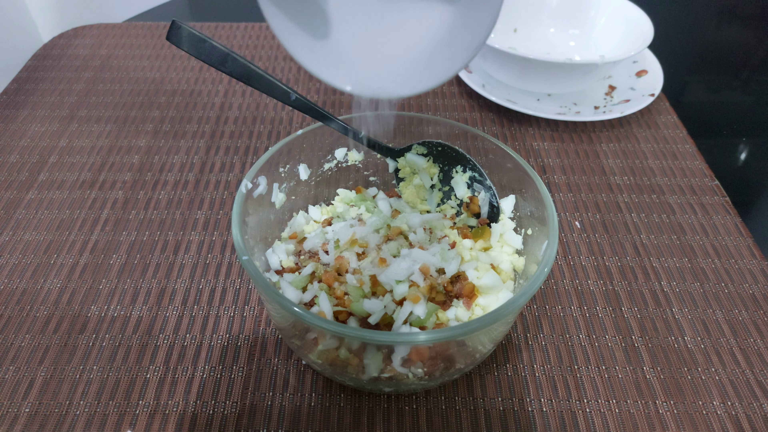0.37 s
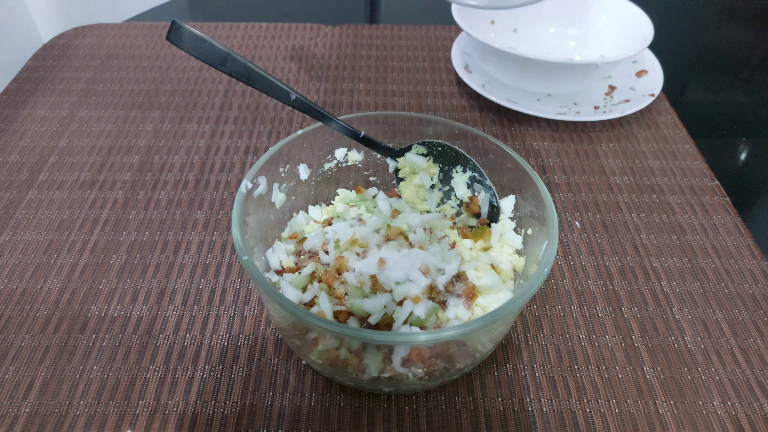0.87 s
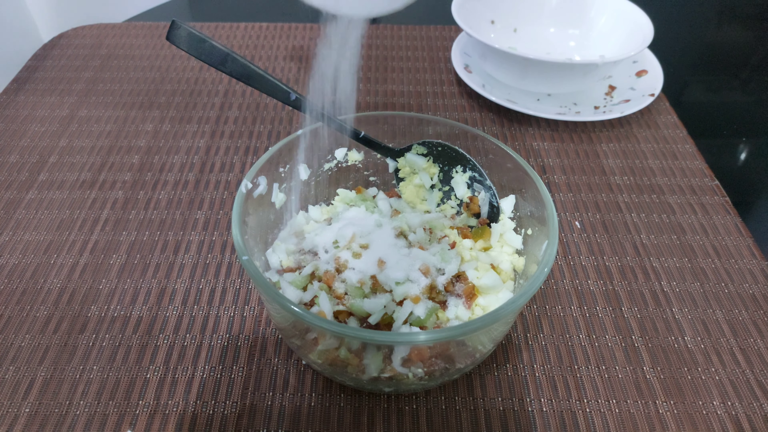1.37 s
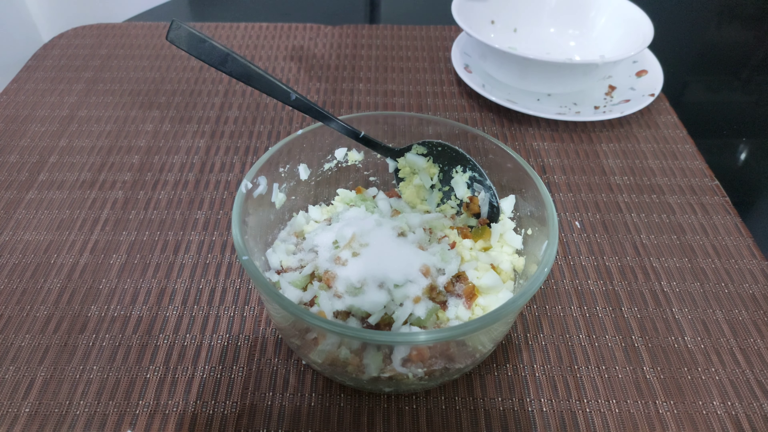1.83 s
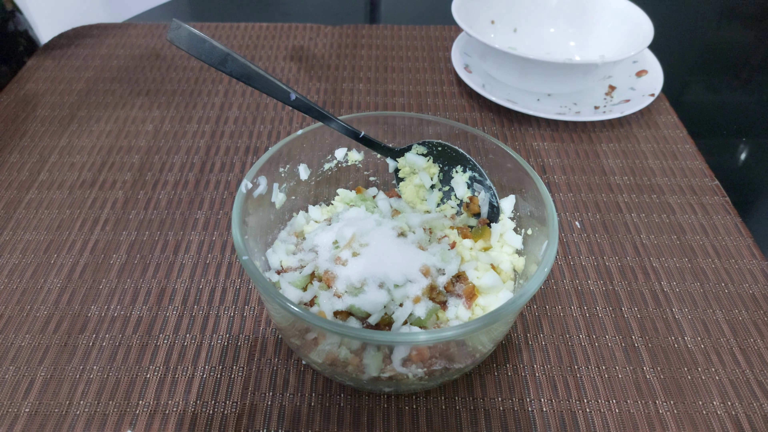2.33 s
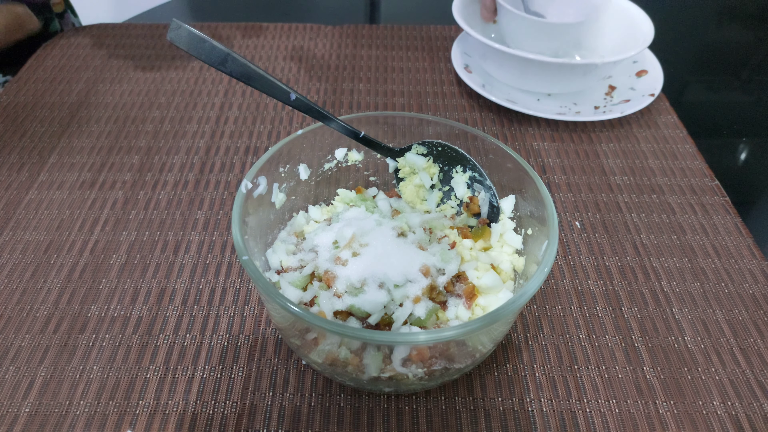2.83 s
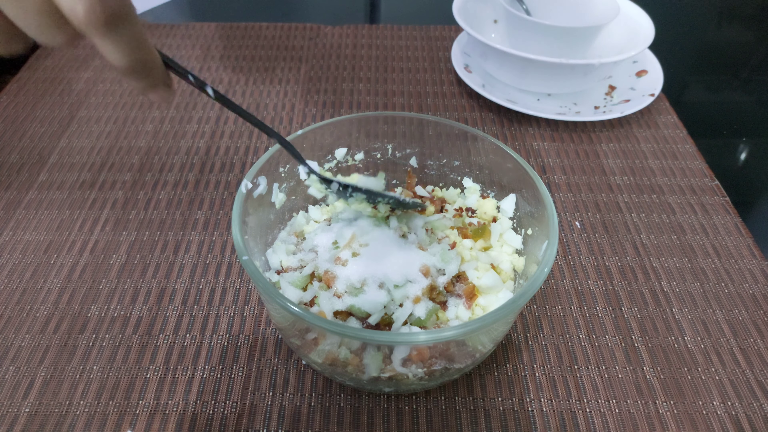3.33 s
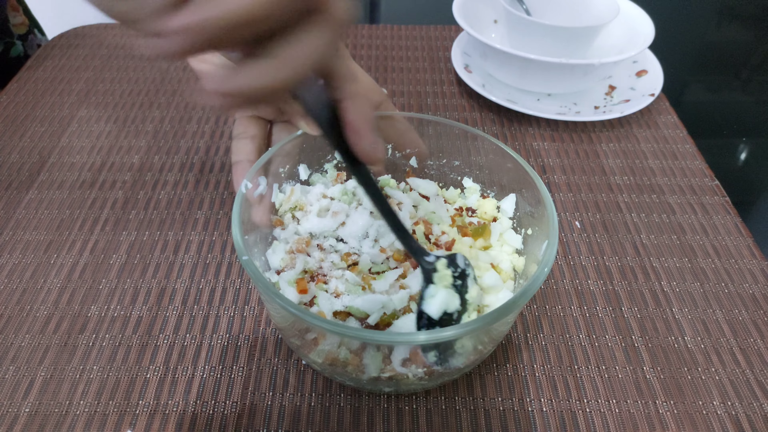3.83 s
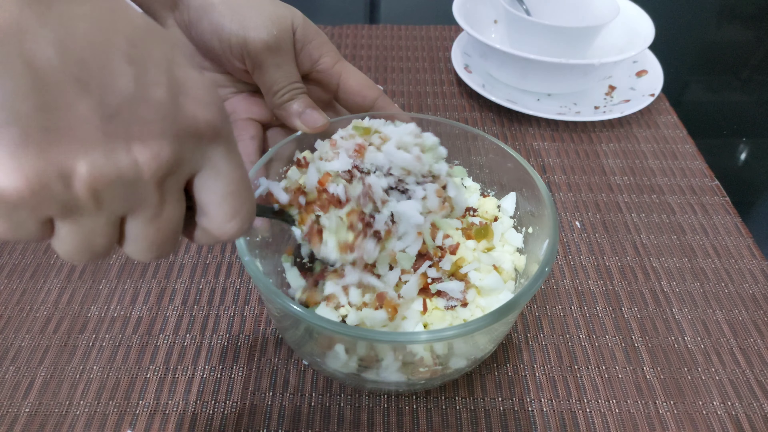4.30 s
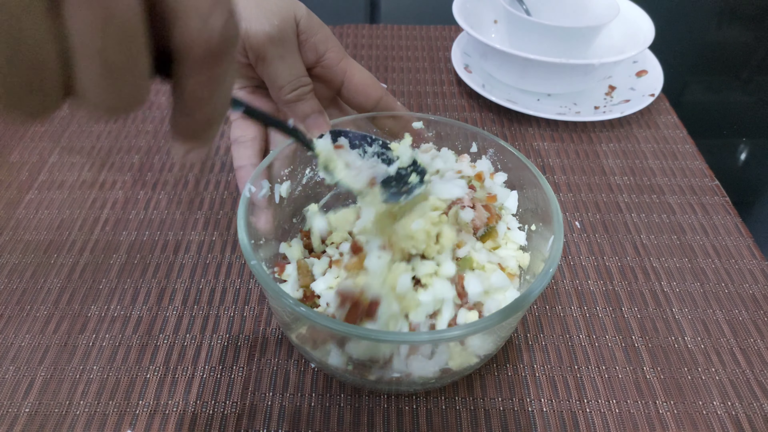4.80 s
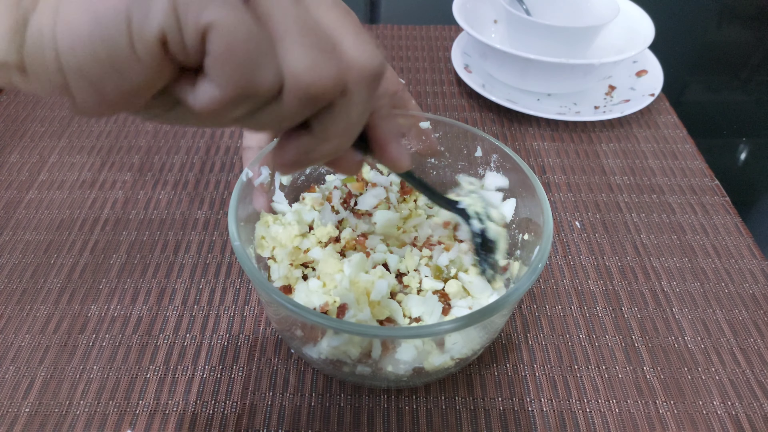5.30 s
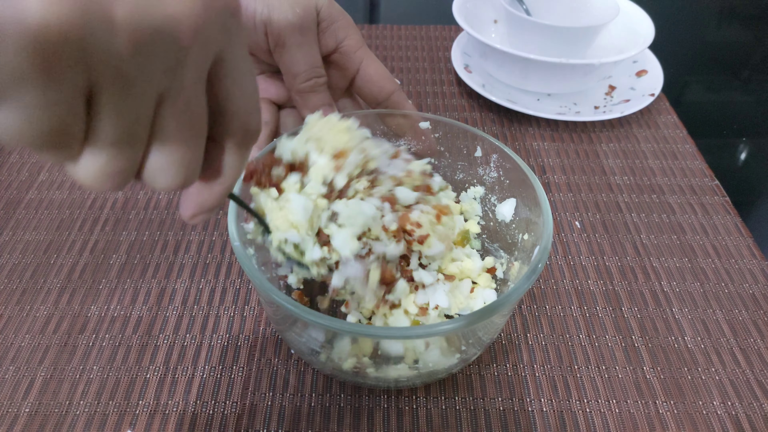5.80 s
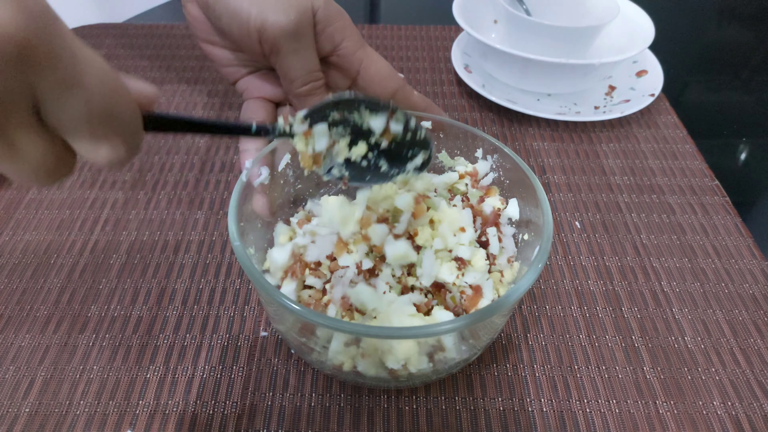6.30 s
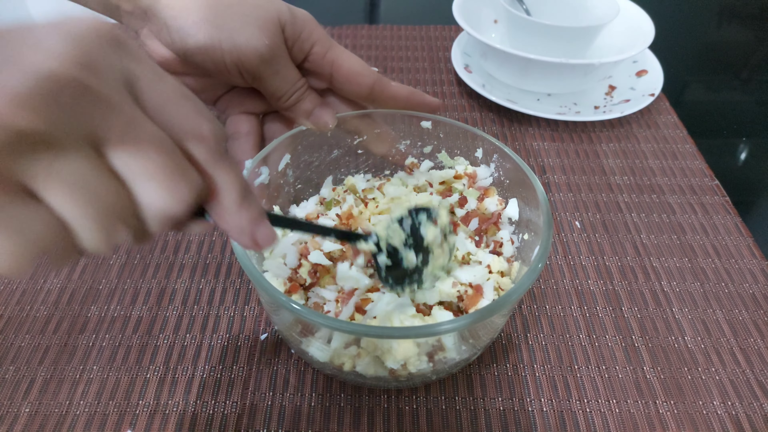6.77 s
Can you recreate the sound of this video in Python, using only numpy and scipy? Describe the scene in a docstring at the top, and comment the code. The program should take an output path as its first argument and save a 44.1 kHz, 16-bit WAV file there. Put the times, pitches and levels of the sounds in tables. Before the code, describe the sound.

Close, single-channel pickup in a hard-walled kitchen. Nearly two seconds of steady rumble and hiss with tiny squeaks, then brushing hands and thin spoon clinks. A stack of ceramic bowls is set down twice, sharp and then heavier with metallic chatter and a faint ringing bowl. After a pause, a spoon scrapes and knocks inside a full glass bowl, with short damped clinks, a rising grating slide and a strong last tap.

```python
"""Spoon and bowls in a small kitchen

A metal spoon clinks and rattles on stacked ceramic bowls, the stack is set down twice on the table,
then the spoon knocks and scrapes inside a glass bowl of food. Clicks set banks of resonances ringing.
Under it filtered noise makes a low room rumble, hiss, faint squeaks and a few soft rustles,
and a pulsed sine makes a far cricket. A short noise tail is the echo of the hard walls."""
import sys
import numpy as np
from scipy import signal
from scipy.fft import rfft, irfft
from scipy.io import wavfile

SR = 44100
rng = np.random.default_rng(int(sys.argv[2]) if len(sys.argv) > 2 else 0)


def generate_wav(sig):
    """Save sig (samples, or channels by samples) to the path in sys.argv[1] as 16-bit PCM at SR."""
    pcm = np.round(np.clip(np.atleast_2d(sig).T, -1, 1) * 32767).astype(np.int16)
    wavfile.write(sys.argv[1], SR, pcm)


def elevation(decibels):
    """Turn decibel levels (scalar or array-like) into linear amplitude ratios."""
    levels = np.asarray(decibels, float)
    return 10 ** (levels / 20)


N = 304290   # samples, 6.9 s

# a plain contact on glass: one level/dB for each zone of modes, low to high
GLASS_PLAIN = [0.15, 0, -1.5, 1.3]
# a broad contact knocks, an edge is bright: rows knock, brightness; columns zones, low to high [dB per dB]
GLASS_FOLLOWS = [
    [0.97, 0.0023, 0, 0],
    [0, 0, 0.65, 1],
]


def rms_one(x):
    """Scale to unit power."""
    return x / np.sqrt(np.mean(x ** 2) + 1e-20)


def at_hz(points, hz):
    """Read a table of (f/Hz, value) on a log-frequency axis."""
    table_hz, values = np.transpose(points)
    return np.interp(np.log(hz), np.log(table_hz), values)


def ring(force, hz, t60):
    """A resonance: a unit click sets a sine of height 1 ringing, 60 dB down after t60 seconds."""
    r, w = elevation(-60 / (t60 * SR)), 2 * np.pi * hz / SR
    return signal.lfilter([0, np.sin(w)], [1, -2 * r * np.cos(w), r * r], force + 1e-18)


def band(x, low_hz, high_hz):
    """Keep only the pitches between two limits (Butterworth band-pass)."""
    edges = [low_hz, min(high_hz, .45 * SR)]
    return signal.sosfilt(signal.butter(2, edges, "band", fs=SR, output="sos"), x)


def coloured(spectrum, x):
    """Give a white signal the spectrum; rms 1."""
    hz = np.maximum(np.fft.rfftfreq(N, 1 / SR), 1)
    return rms_one(irfft(rfft(x) * elevation(at_hz(spectrum, hz)), N))


def grains(per_s, spread_db):
    """Uneven random clicks of unit power, like many tiny contacts."""
    sizes = elevation(spread_db * np.minimum(rng.exponential(1, N), 5)) * rng.choice([-1, 1], N)
    return rms_one(sizes * (rng.random(N) < per_s / SR))


def drift(rate):
    """Random wander of spread 1, with a new target `rate` times a second."""
    knots = rng.standard_normal(int(7 * rate) + 2)
    return np.interp(np.arange(N) / SR * rate, np.arange(len(knots)), knots)


def swell(start, rise, fall, depth_db):
    """Gain that climbs to 1 and sinks again, straight in dB; silent outside."""
    corners = np.cumsum([start, rise, fall])
    db = np.interp(np.arange(N) / SR, corners, [-depth_db, 0, -depth_db], left=-200, right=-200)
    return elevation(db)


def while_touching(spans):
    """Gains of each column over time, silent between the spans."""
    t, out = np.arange(N) / SR, 0
    for rows in spans:
        s, *columns = np.transpose(rows)
        out = out + np.array([elevation(np.interp(t, s, c, left=-200, right=-200)) for c in columns])
    return out


def room_rumble():
    """Low background rumble: steady noise gathered at low pitches."""
    # shape of the rumble: f/Hz, relative level per Hz/dB
    spectrum = [(15, -38), (25, -14.5), (53, -2.5), (91, -11), (117, -4), (167, 0.5), (204, -5), (237, -3),
                (260, -7.5), (293, -6.5), (413, -12.5), (448, -16), (600, -19.5), (780, -47), (1320, -120)]
    return elevation(-57) * coloured(spectrum, rng.standard_normal(N))


def room_hiss():
    """Faint steady hiss: noise spread from the middle pitches upward."""
    # shape of the hiss: f/Hz, relative level per Hz/dB
    spectrum = [(290, -28.5), (500, -5.5), (706, -5), (1990, -15), (2600, -18.5), (2900, -15),
                (3300, -19.5), (4310, -21), (8600, -22.5), (11200, -28.5), (12000, -33), (15500, -37.5)]
    return elevation(-69.5) * coloured(spectrum, rng.standard_normal(N))


def cricket():
    """Far cricket: short sine chirps at a near-steady rate, randomly stronger and weaker."""
    pitch_hz, per_s, level_db = 6680, 12.6, -81
    count = int(N / SR * per_s) - 1
    times = 0.078 + np.arange(count) / per_s + rng.normal(0, .003, count)
    gate = np.zeros(N)
    gate[(times * SR).astype(int)] = elevation(level_db + rng.normal(0, 3, count))
    gate = signal.fftconvolve(gate, np.hanning(900), "same")   # each chirp is 900 samples long
    return gate * np.sin(2 * np.pi * pitch_hz * np.arange(N) / SR)


def squeaks():
    """Faint high whistles: noise through one narrow resonance, swelling and fading."""
    # the whistles: t/s, length/s, level/dB
    whistles = [(.62, .05, -87), (1.12, .08, -80), (1.547, .06, -82)]
    t = np.arange(N) / SR
    gain = sum(elevation(db) * np.exp(-((t - s) / (.5 * length)) ** 2) for s, length, db in whistles)
    return gain * rms_one(ring(rng.standard_normal(N), hz=8600, t60=0.018))


def rustles():
    """Hands and food brushing: dense fine grains over a dull body."""
    # each rustle: t/s at the start, rise/s, fall/s, hiss level/dB, dull level/dB before a small cut
    brushes = [(1.86, .02, 0.25, -66.5, -68.5), (1.99, 0.042, .075, -68, -58.5),
               (2.16, .007, .013, -66, -75), (2.255, .016, .06, -59, -60), (3.79, 0.0306, .035, -69, -74),
               (4.96, .03, 0.038, -71, -82), (5.338, .014, .012, -50.5, -54),
               (5.35, .012, 0.09, -63.5, -72), (6.72, .04, 0.108, -58.5, -62)]
    # shape of the hiss: f/Hz, relative level per Hz/dB
    spectrum = [(1180, -41), (2000, -14), (3210, 0.5), (3900, -4), (8520, -12.5), (14000, -31)]
    hiss, dull = 0, 0
    for s, rise, fall, hiss_db, dull_db in brushes:
        gain = swell(s, rise, fall, depth_db=21)
        hiss = hiss + elevation(hiss_db) * gain
        dull = dull + elevation(dull_db) * gain
    fine = grains(5000, spread_db=3.5)
    return hiss * coloured(spectrum, fine) + elevation(-2.5) * dull * rms_one(band(fine, 450, 2300))


def free_bowl():
    """One bowl rings on: a single faint resonance struck once, heard direct."""
    # the strike: t/s, f/Hz, level/dB, ring time to -60 dB/s
    strike = (3.09, 617, -46, .8)
    s, hz, db, t60 = strike
    return ring(elevation(db) * (np.arange(N) == round(s * SR)), hz, t60)


def table():
    """Soft low pushes make the resonances of the table top answer."""
    # the pushes: t/s, level/dB before a small cut
    thuds = [(2.855, -38), (2.906, -24), (3.05, -27), (3.965, -40), (5.956, -40.5)]
    # resonances of the table top: f/Hz, level before the band-pass/dB, ring time to -60 dB/s
    modes = [(85, -3, .07), (116, 5.5, 0.032), (174.4, 0.5, 0.09), (272, -2, 0.034)]
    force = np.zeros(N)
    for s, db in thuds:
        force[round(s * SR)] = elevation(db - 3.5)
    return band(sum(elevation(db) * ring(force, hz, t60) for hz, db, t60 in modes), 98, 500)


def kitchen(x):
    """Echo of the hard walls: noise dying band by band, starting after the first reflection."""
    # how long the echo lasts: f/Hz, time to -60 dB/s
    echo_time = [(100, 0.51), (500, 0.5), (2000, .33), (6000, 0.34), (14000, 0.13)]
    t = np.arange(SR // 2) / SR
    edges = 70 * 2 ** np.arange(0, 8.5, .5)   # Hz, half-octave bands
    white = rng.standard_normal((2, len(t)))
    tail = 0
    for k, (low, high) in enumerate(zip(edges, edges[1:])):
        dying = elevation(-60 * t / at_hz(echo_time, np.sqrt(low * high)))
        tail = tail + band(white[k % 2], low, high) * dying
    tail = tail * np.clip((t - .003) / 0.0073, 0, 1)
    return elevation(-10.5) * signal.fftconvolve(x, tail / np.sqrt(np.sum(tail ** 2)))[:N]


def glass_tones():
    """The glass sings briefly, knocked or rubbed by the spoon: short wavering sines swell and fade."""
    # each tone: t/s at the middle, f/Hz before the waver, length/s, level/dB
    songs = [(3.99, 1263, 0.031, -52), (3.985, 5330, 0.045, -59), (4.002, 1016, 0.071, -54),
             (3.981, 3150, .03, -55), (5.755, 960, .08, -59), (4.037, 4080, 0.023, -48),
             (4.196, 2330, 0.014, -44), (4.2, 4030, 0.028, -52), (4.392, 4095, 0.012, -45.5),
             (5.839, 4300, 0.009, -37.5), (5.926, 4630, 0.0099, -39.5), (6.072, 4020, 0.012, -54),
             (6.094, 2345, 0.025, -50), (6.099, 6200, 0.022, -61.5), (6.101, 990, 0.018, -52.5),
             (6.303, 4050, 0.013, -63.5)]
    t, out = np.arange(N) / SR, np.zeros(N)
    waver = np.cumsum(drift(rate=130)) / SR
    for s, hz, length, db in songs:
        gain = elevation(db) * np.exp(-((t - s) / (0.33 * length)) ** 2)
        out += gain * np.sin(2 * np.pi * hz * (t + 0.0056 * waver))
    return out


def slide():
    """The spoon drawn up the glass wall: its rough grating rises as the free length shortens."""
    # start and end of the slide: t/s, f/Hz, level/dB
    path = [(5.72, 3585, -46.5), (5.95, 4730, -66.5)]
    # the rough tones: multiple of the gliding pitch, relative level/dB
    partials = [(.74, -4), (1, 1.5), (1.201, -5.5)]
    s, hz, db = np.transpose(path)
    t, out = np.arange(N) / SR, np.zeros(N)
    turns = np.cumsum(np.interp(t, s, hz)) / SR
    for multiple, level_db in partials:
        rough = rms_one(band(grains(1500, spread_db=5.0), 10, 117))
        gain = elevation(level_db + 4.3 * drift(rate=35))   # each tone comes and goes
        out += gain * rough * np.sin(2 * np.pi * multiple * turns)
    return out * elevation(np.interp(t, s, db, left=-200, right=-200))


def by_zone(level_db, character_db, plain, follows):
    """dB in each zone of modes (last axis) from a contact's level and character."""
    return np.asarray(level_db)[..., None] + plain + np.asarray(character_db) @ np.array(follows)


def blows(rows, plain, follows):
    """Turn (t/s, level/dB, character/dB ..) into rows of (t/s, dB in each zone)."""
    rows = np.array(rows)
    return np.c_[rows[:, 0], by_zone(rows[:, 1], rows[:, 2:], plain, follows)]


def rattle(rows, plain, follows):
    """Gain of each zone over time for loose chatter that swells and dies away."""
    out = 0
    for s, rise, fall, db, character_db in rows:
        zone_gain = elevation(by_zone(db, [character_db], plain, follows))
        out = out + zone_gain[:, None] * swell(s, rise, fall, depth_db=22.5)
    return out


def body(modes, zones, hits, touch, per_s, hit_db, rub_db, crack_db, hiss_db,
         sharp, longest_s, patchy_db, top_hz):
    """Blows and dense small contacts drive the modes; a broad crack and hiss fill in between them."""
    modes, hits = np.array(modes), np.array(hits)
    zone = np.searchsorted(zones, modes[:, 0])
    at = (hits[:, 0] * SR).round().astype(int)
    chatter = grains(per_s, spread_db=2.5)
    uneven = rng.normal(0, 3.3, (len(hits), len(modes)))   # dB, no two blows alike
    out = np.zeros(N)
    for k, (hz, width, level_db) in enumerate(modes):
        z = zone[k]
        level_db = level_db - modes[zone == z, 2].max()   # the strongest mode of each zone is at 0 dB
        t60 = min(sharp * np.log(1000) / (np.pi * width), longest_s)   # a narrow mode rings longer
        # the loudness of the ringing follows the touch, however long the ring
        force = touch[z] * chatter * np.sqrt(4 * np.log(1000) / (t60 * SR))
        force *= elevation(rub_db + patchy_db * drift(rate=30))   # the contact point wanders across the nodes
        force[at] += elevation(hits[:, 1 + z] + hit_db + uneven[:, k])
        built_up = band(ring(force, hz, t60), hz - 320, hz + 320)   # the ring takes a moment to build
        out += elevation(level_db) * (-1) ** k * built_up
    edges = [0.53 * modes[:, 0].min(), *zones, top_hz]
    puff = rng.standard_normal(300) * np.exp(-np.arange(300) / (0.001 * SR))   # a crack of a few ms
    grit = grains(5000, spread_db=4.0)   # the finest roughness of the surfaces
    for z in range(4):
        clicks = np.zeros(N)
        clicks[at] = elevation(hits[:, 1 + z] + crack_db)
        broad = signal.fftconvolve(clicks, puff)[:N] + elevation(hiss_db) * touch[z] * grit
        share = np.sqrt(SR / 2 / (edges[z + 1] - edges[z]))   # makes up for the power outside the zone
        out += share * band(band(broad, edges[z], edges[z + 1]), .5 * edges[0], top_hz)
    return out


def scrape():
    """Gain of each zone over time while the spoon rubs the glass."""
    # two strokes along the glass: t/s, pressure level/dB, brightness/dB
    strokes = [
        [(3.965, -57.5, -0.5), (4.1, -64, -6.5), (4.22, -64.5, -2.5), (4.41, -67, -5), (4.46, -80, -6)],
        [(5.715, -54.5, -3.5), (5.83, -64.5, 6.5), (5.9, -61, -1), (5.955, -75, 3), (6.08, -65, -11),
         (6.13, -84, 0.5)],
    ]
    spans = []
    for stroke in strokes:
        rows = [(s, db, -1, bright_db) for s, db, bright_db in stroke]   # knock stays at -1 dB
        spans.append(blows(rows, GLASS_PLAIN, GLASS_FOLLOWS))
    return while_touching(spans)


def glass():
    """Glass bowl of food: the spoon's knocks and strokes excite its broad, short resonances."""
    # resonances of the glass: f/Hz, width/Hz before `sharp`, relative level/dB
    modes = [(960, 34, -5.5), (1077, 130, -3), (1346, 280, -2), (1970, 480, 2), (2330, 94, -4.5),
             (3060, 160, 0.5), (3448, 150, -4), (3760, 130, 2), (4080, 110, 6.5), (4410, 200, 3.5),
             (4920, 100, 1.5), (5415, 130, -2.5), (5960, 130, -0.5), (6270, 34, -8), (6674, 190, 2),
             (7166, 210, -2), (8680, 120, 1), (9200, 150, -5.5), (9800, 74, -16), (10730, 79, -13.5),
             (10900, 80, -25), (13100, 190, -25)]
    # limits between the four zones of modes: f/Hz
    zones = [1500, 3500, 5300]
    # knocks: t/s, relative level/dB, knock/dB, brightness/dB
    knocks = [(2.349, -60, 20, 8), (3.966, -47.5, 7, -5), (4.033, -43.5, -12, 14), (4.05, -41, -22, -11),
              (4.154, -50, -10, -3), (4.193, -40.5, -8, -6), (4.252, -62.5, 1, 15), (4.32, -47.5, 3, -4),
              (4.425, -38.5, -5, -13.5), (5.348, -43.5, -19, -3.5), (5.581, -55.5, 6, 10),
              (5.585, -39, -10, -7.5), (5.608, -52.5, -8, 3.5), (5.682, -49, -20, -11),
              (5.718, -40.5, -7, 2.5), (5.721, -32.5, 5, -3), (5.79, -38.5, -14, 4), (5.836, -44, -7, -2),
              (5.915, -47, 1.5, 0), (5.9565, -19, -12, -6.5), (6.529, -57.5, -14.5, 4.5)]
    return body(modes, zones, blows(knocks, GLASS_PLAIN, GLASS_FOLLOWS), scrape(),
                per_s=1300, hit_db=-5, rub_db=-6, crack_db=-8.5, hiss_db=-4.5,
                sharp=0.87, longest_s=0.046, patchy_db=6.5, top_hz=10950)


def china():
    """Stacked ceramic bowls: blows and rattling set many resonances ringing."""
    # resonances of the bowls: f/Hz, width/Hz before `sharp`, relative level/dB
    modes = [(344, 31, -5.5), (800, 30, -6), (990, 71, 0.5), (1440, 150, -1), (1735, 150, -9.5),
             (2222, 31, -1), (2377, 50, 1.5), (2630, 60, -5), (2986, 60, 2.5), (3370, 110, -1),
             (3700, 60, -4.5), (4150, 110, 0.5), (4510, 70, -1.5), (4623, 70, -2), (4900, 47, -5),
             (5407, 88, -0.5), (5790, 88, -3.5), (6200, 80, -7.5), (6530, 64, -6), (6700, 80, -6),
             (7240, 92, -7.5), (8100, 86, -12.5), (8800, 120, -9), (9400, 120, -25), (10800, 100, -24),
             (11150, 100, -22), (13100, 100, -28.5), (13400, 100, -27.5)]
    # limits between the four zones of modes: f/Hz
    zones = [1300, 3800, 7500]
    # blows: t/s, relative level/dB, brightness/dB
    strikes = [(2.265, -52.5, -9), (2.279, -60.5, -0.5), (2.855, -40.5, -10), (2.906, -11, 0.5),
               (2.909, -16, -2), (2.918, -18, -1.5), (2.922, -19, -2), (3.049, -16, -9.5), (3.06, -25, 5),
               (3.084, -27.5, 4)]
    # rattles: t/s at the start, rise/s, fall/s, relative peak level/dB, brightness/dB
    rattles = [(2.905, .008, 0.097, -23.5, 8), (3.035, .02, .105, -23, -1.5)]
    # a plain contact: one level/dB for each zone, low to high
    plain = [-6.5, 0, -6, -11.5]
    # harder contact, more treble: one row, columns zones, low to high [dB per dB of brightness]
    follows = [
        [-.3, 0.0033, .9, 0.77],
    ]
    return body(modes, zones, blows(strikes, plain, follows), rattle(rattles, plain, follows),
                per_s=2500, hit_db=-5, rub_db=-9.5, crack_db=-8, hiss_db=-11,
                sharp=0.36, longest_s=0.092, patchy_db=3.5, top_hz=11600)


def spoon():
    """Metal spoon: clinks and loose chatter set its resonances ringing, mostly high."""
    # resonances of the spoon: f/Hz, width/Hz before `sharp`, relative level/dB
    modes = [(1859, 180, -11.5), (2450, 620, -8.5), (3477, 90, -17), (4020, 110, -20.5), (4784, 70, -13),
             (5260, 220, -18), (5773, 220, -17), (6420, 160, -19), (7090, 200, -13), (8190, 110, -5.5),
             (8520, 58, -4.5), (8690, 32, -2.5), (8833, 76, -4), (9200, 130, -18), (11190, 56, -22),
             (12900, 70, -19.5), (13200, 66, -22.5), (14240, 60, -34.5), (14760, 80, -29.5),
             (15100, 60, -33.5)]
    # limits between the four zones of modes: f/Hz
    zones = [4000, 7800, 10000]
    # clinks: t/s, relative level/dB, ring/dB
    clinks = [(2.376, -29, 13), (2.381, -33.5, 12), (2.406, -35, -3), (2.4144, -40.5, 5), (2.587, -52, 1),
              (2.6344, -53, 10), (2.6464, -43.5, 19), (2.659, -39, 2), (2.681, -44.5, -5), (3.055, -25, 3),
              (3.0946, -31, 8)]
    # rattles: t/s at the start, rise/s, fall/s, relative peak level/dB, ring/dB
    rattles = [(2.395, 0.014, 0.05, -40, -6), (2.585, .01, .06, -55, -1), (2.625, 0.03, .09, -41, -1),
               (3.045, 0.016, 0.062, -26, -5.5), (3.05, 0.04, 0.1, -32, 7.5)]
    # a plain clink: one level/dB for each zone, low to high
    clink_plain = [-0.5, -1.5, -0.5, -25.5]
    # struck away from the grip, the high modes sing: one row, columns zones [dB per dB of ring]
    clink_follows = [
        [-.1, 0.00049, 0.95, .3],
    ]
    # loose chatter is brighter than a blow: one level/dB for each zone, low to high
    rattle_plain = [0, 0, 0, -17.5]
    # how chatter follows its ring: one row, columns zones [dB per dB of ring]
    rattle_follows = [
        [-.1, -.4, 0.97, 0.95],
    ]
    return body(modes, zones, blows(clinks, clink_plain, clink_follows),
                rattle(rattles, rattle_plain, rattle_follows),
                per_s=2100, hit_db=-4.0, rub_db=-10.5, crack_db=-16.5, hiss_db=-13.5,
                sharp=.8, longest_s=0.056, patchy_db=4.5, top_hz=11700)


def scene():
    """Near sources with their room, over the background."""
    near = spoon() + china() + glass() + slide() + glass_tones() + table() + rustles()
    background = room_rumble() + room_hiss() + cricket() + squeaks()
    mix = near + kitchen(near) + background + free_bowl()
    return mix[None]   # one channel


def band_limit(x):
    """A steep low-pass at the top of the band."""
    return signal.sosfilt(signal.butter(12, 15690, fs=SR, output="sos"), x)


def record(dry):
    """A soft limiter rounds off the tallest peaks."""
    ceiling = .55   # the height that peaks approach but never pass
    rounded = ceiling * np.tanh(dry / ceiling)
    return band_limit(rounded)


dry = scene()
out = record(dry)
generate_wav(out)
```